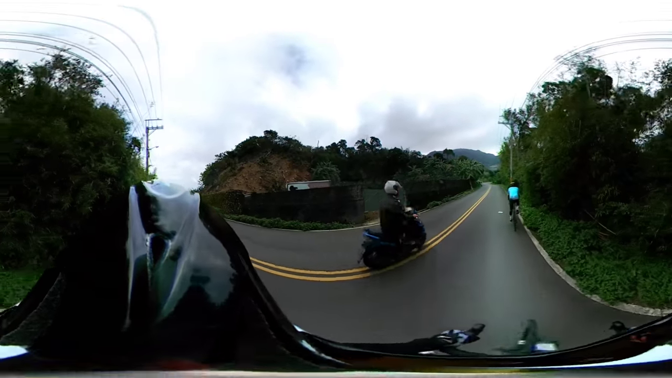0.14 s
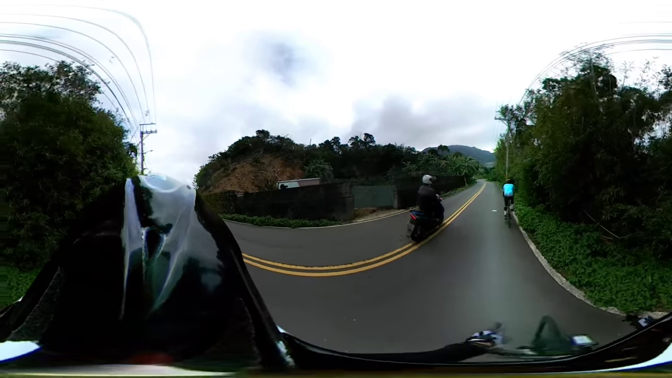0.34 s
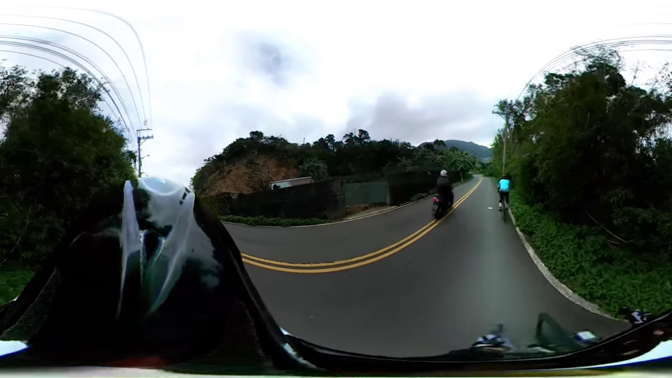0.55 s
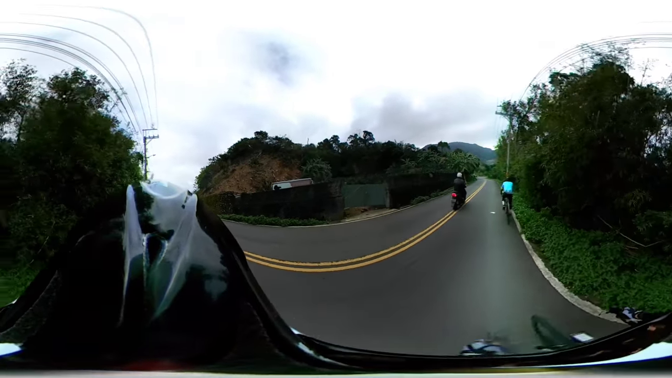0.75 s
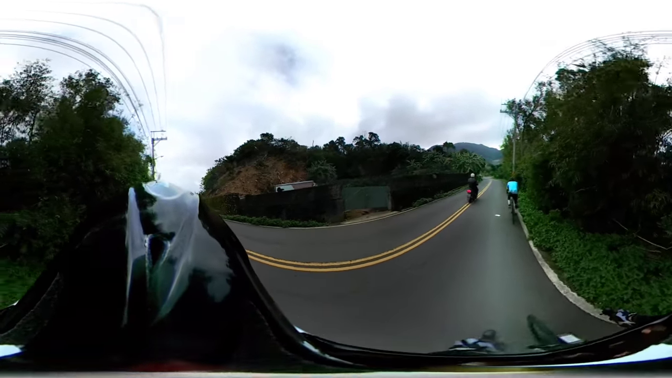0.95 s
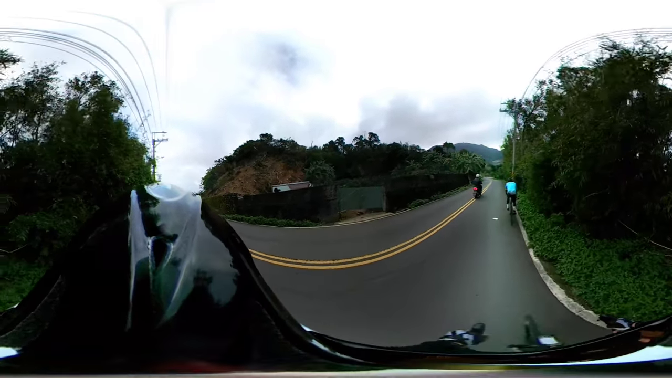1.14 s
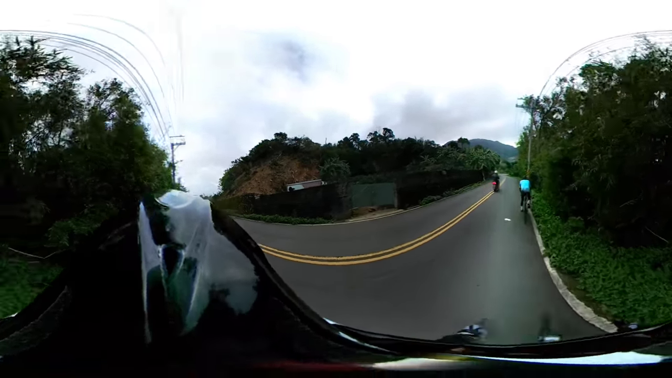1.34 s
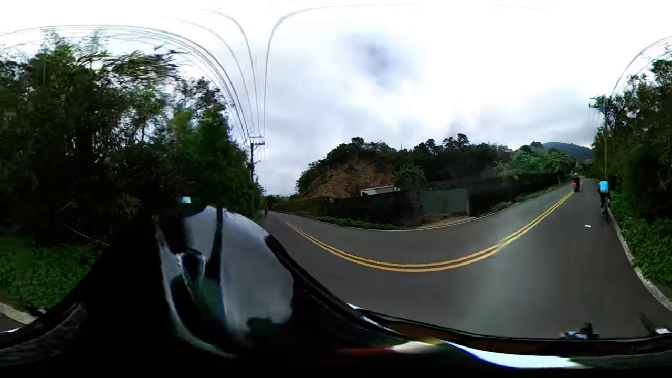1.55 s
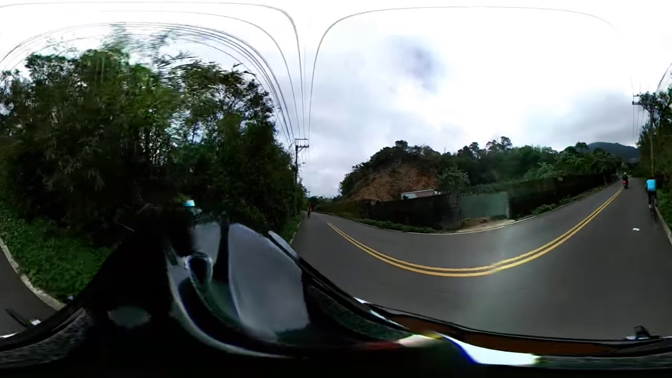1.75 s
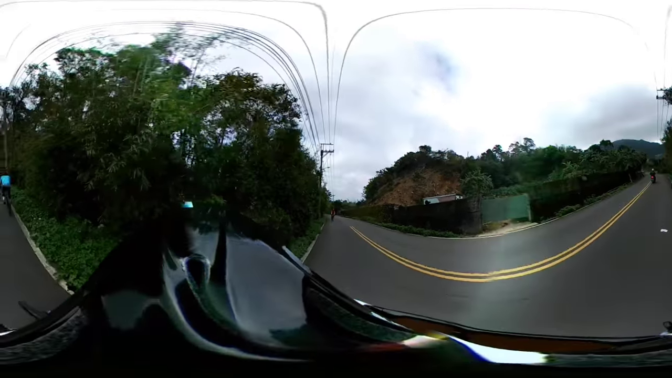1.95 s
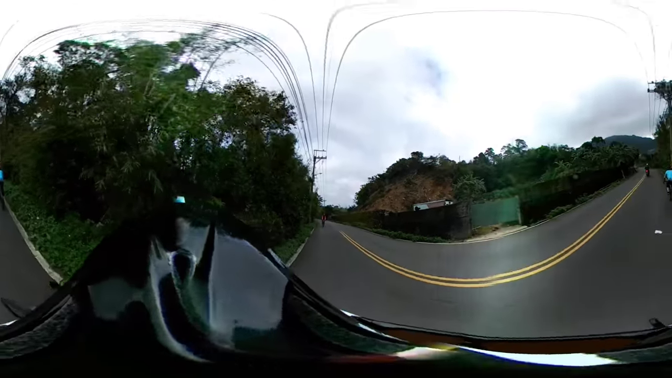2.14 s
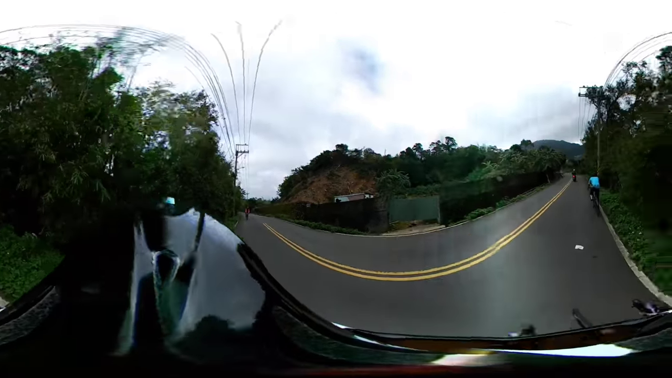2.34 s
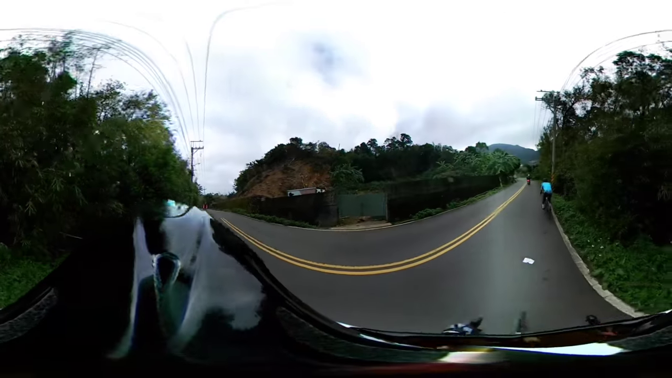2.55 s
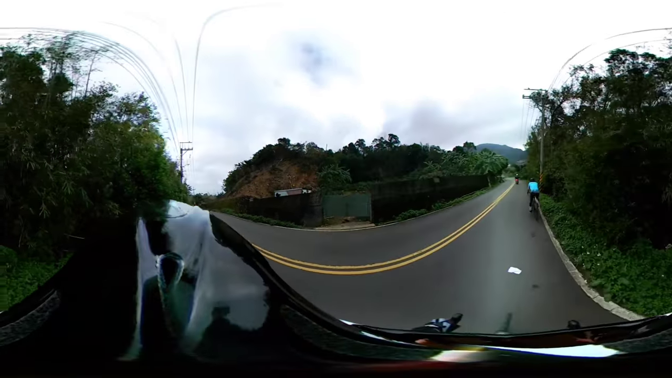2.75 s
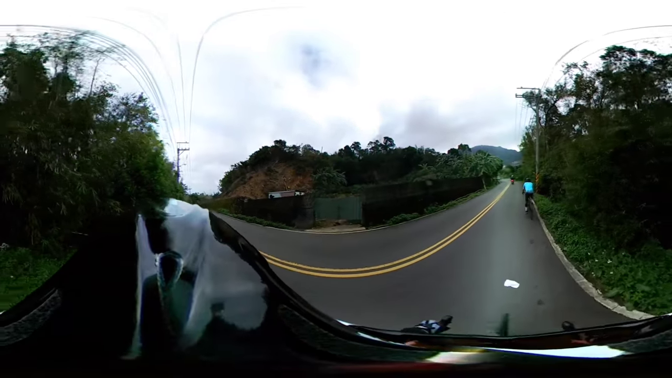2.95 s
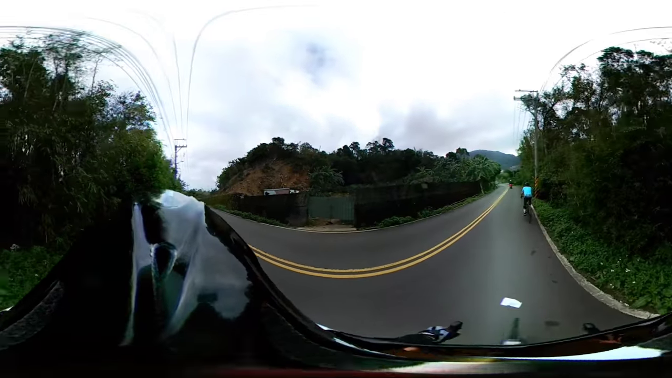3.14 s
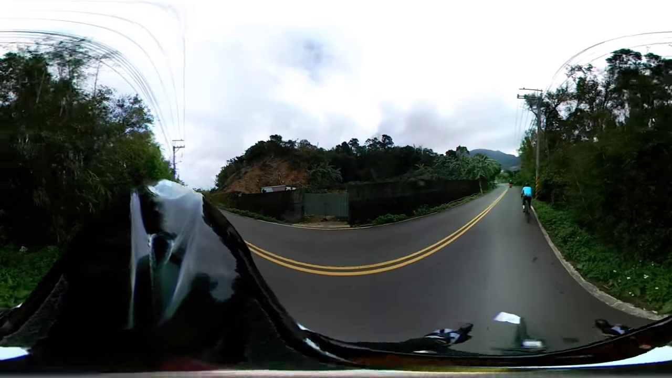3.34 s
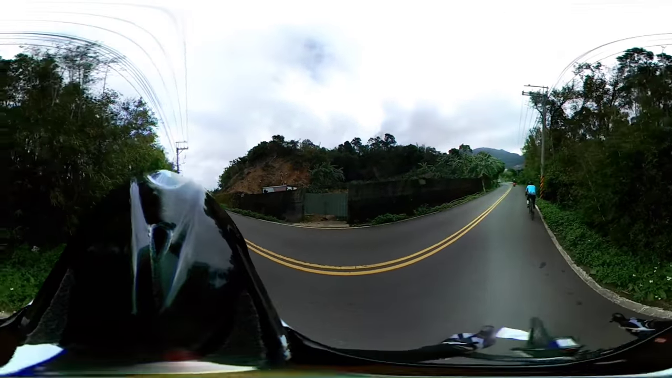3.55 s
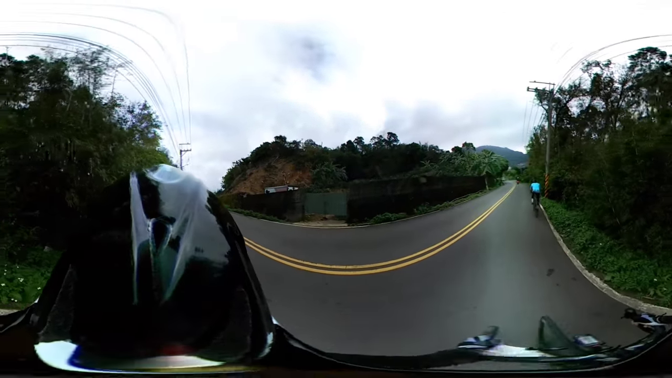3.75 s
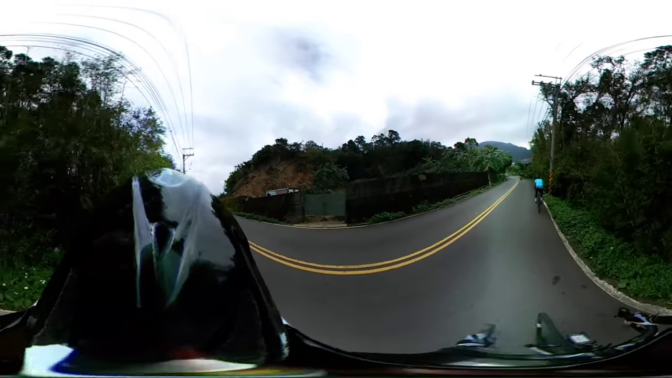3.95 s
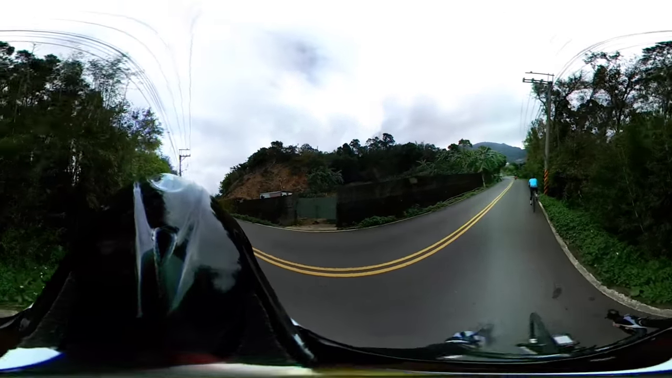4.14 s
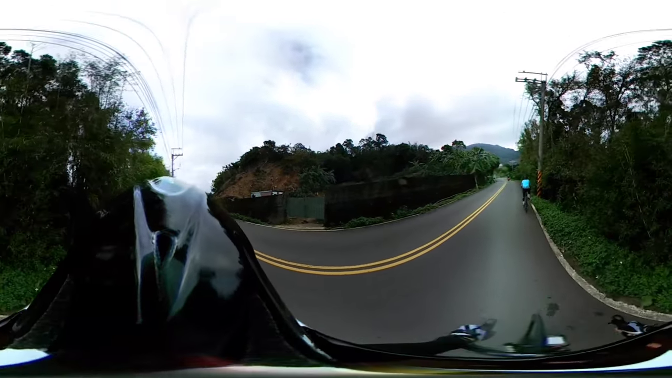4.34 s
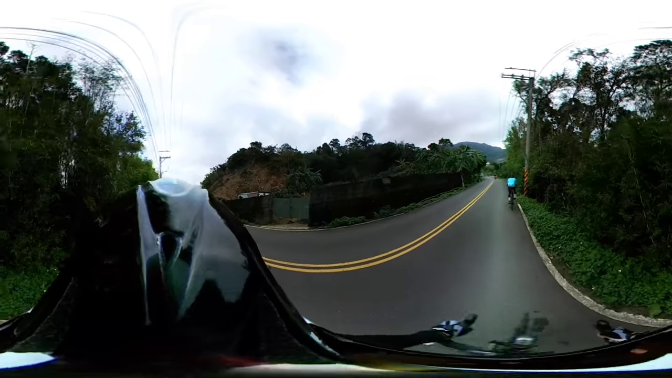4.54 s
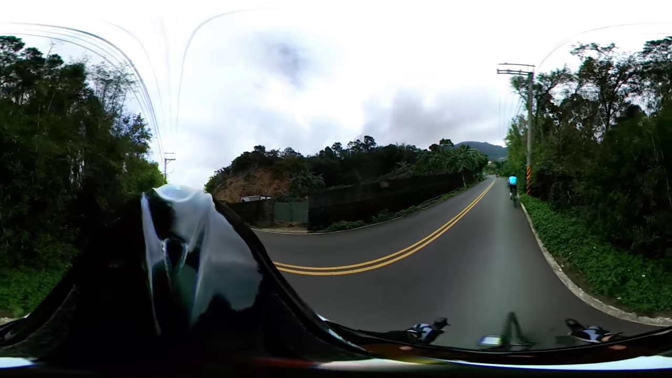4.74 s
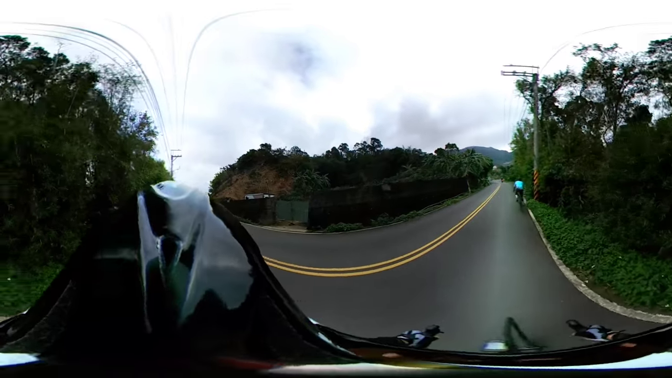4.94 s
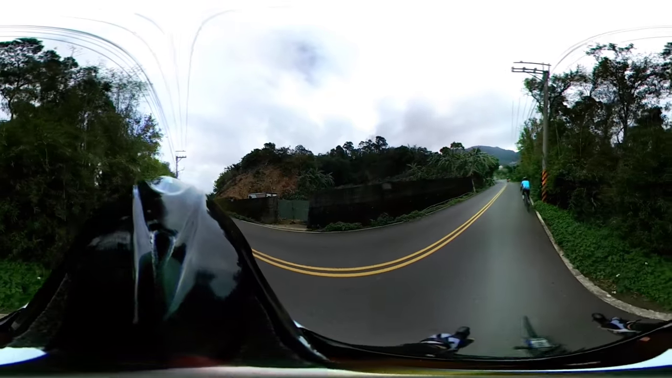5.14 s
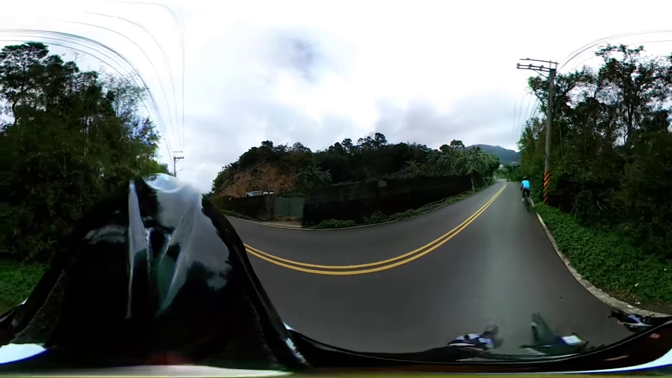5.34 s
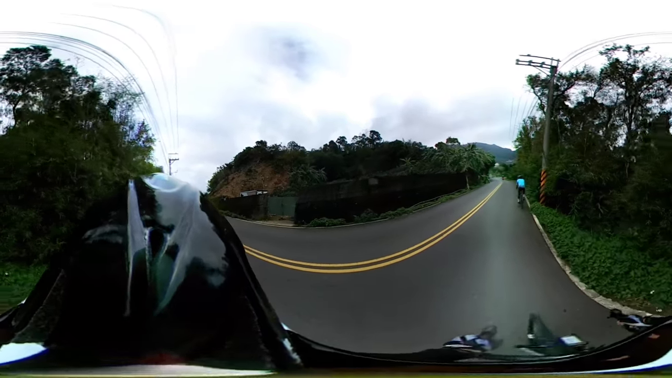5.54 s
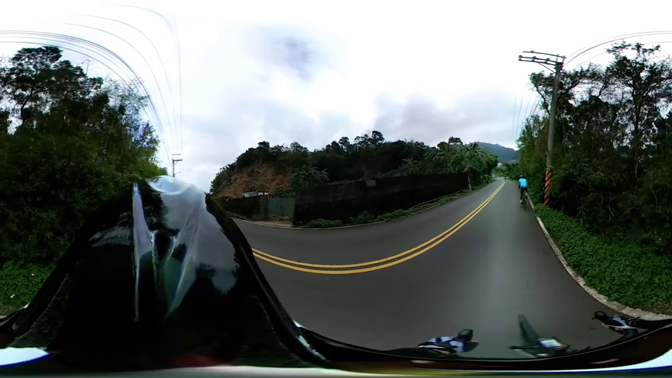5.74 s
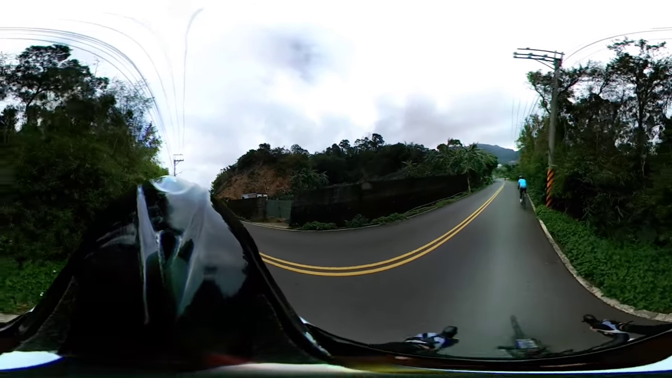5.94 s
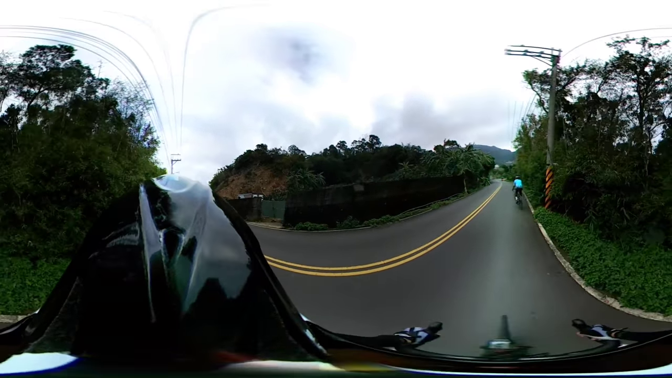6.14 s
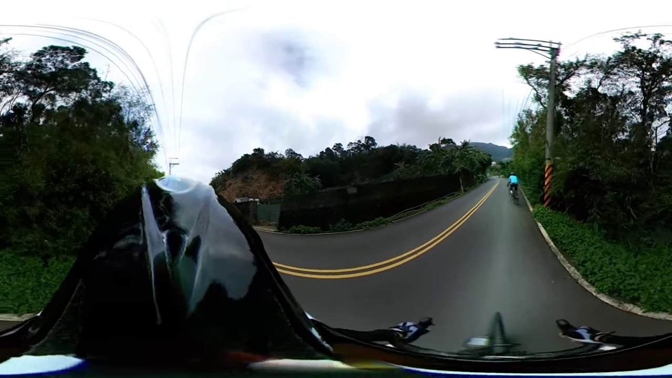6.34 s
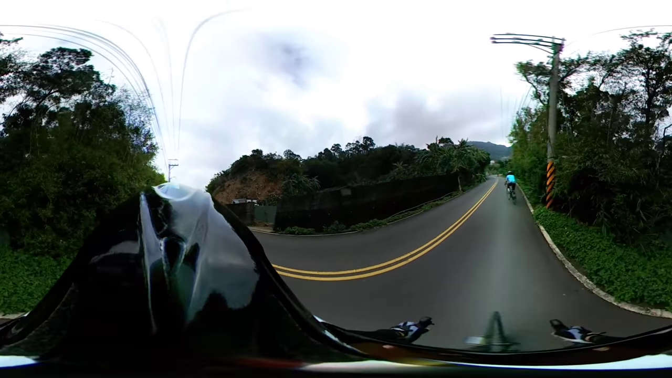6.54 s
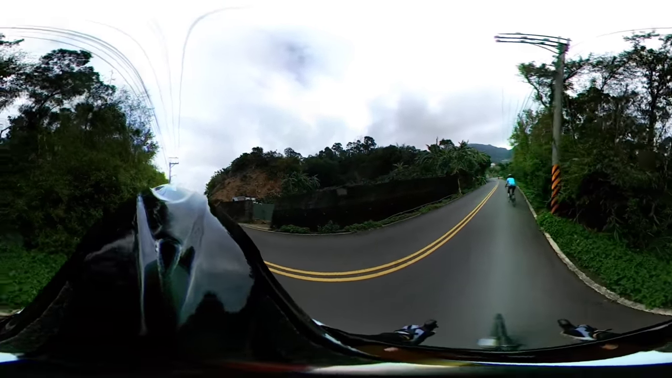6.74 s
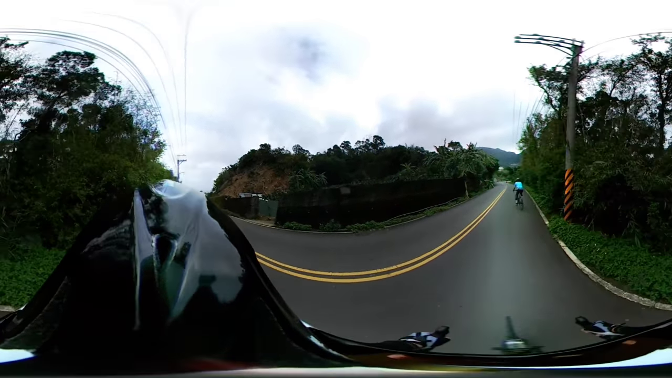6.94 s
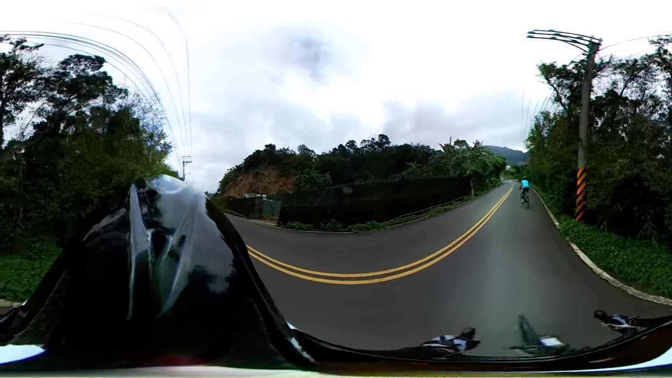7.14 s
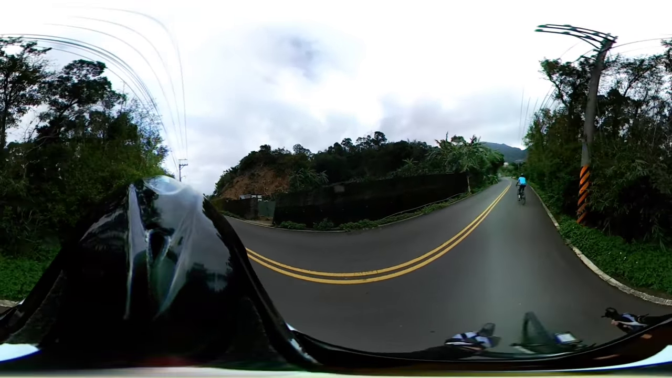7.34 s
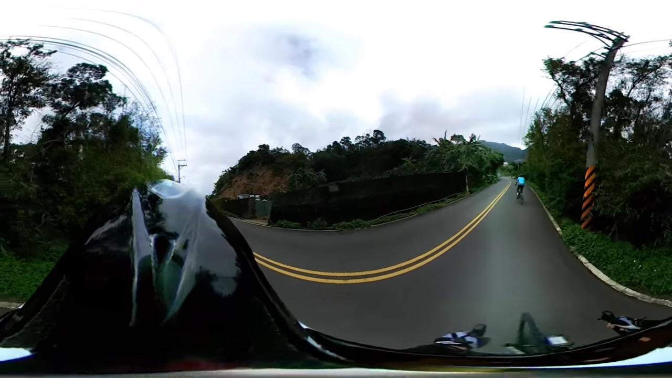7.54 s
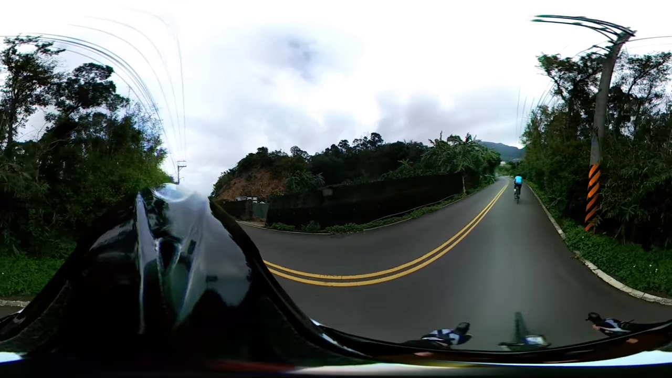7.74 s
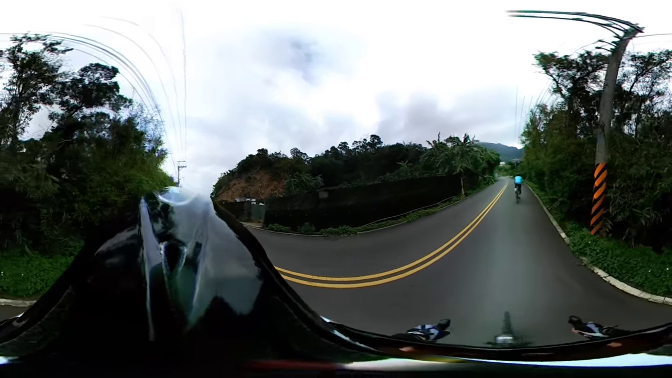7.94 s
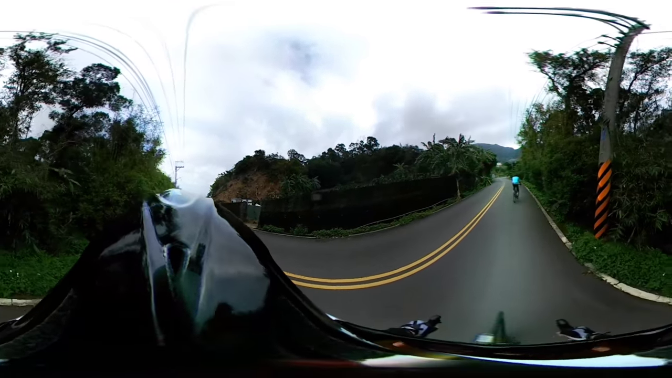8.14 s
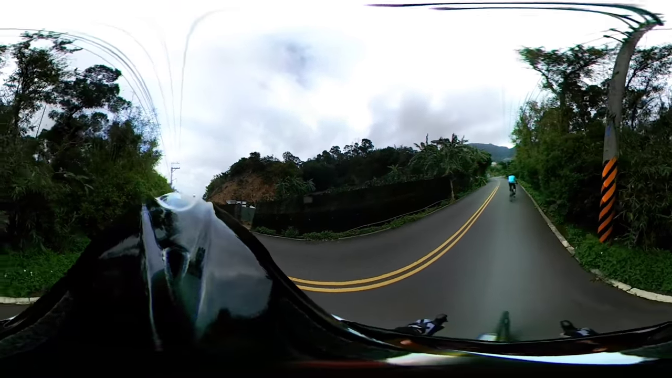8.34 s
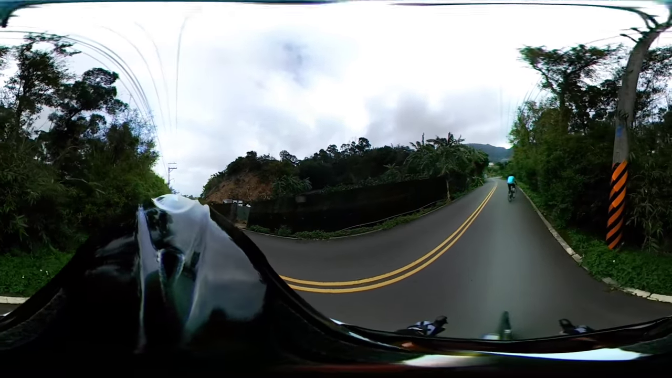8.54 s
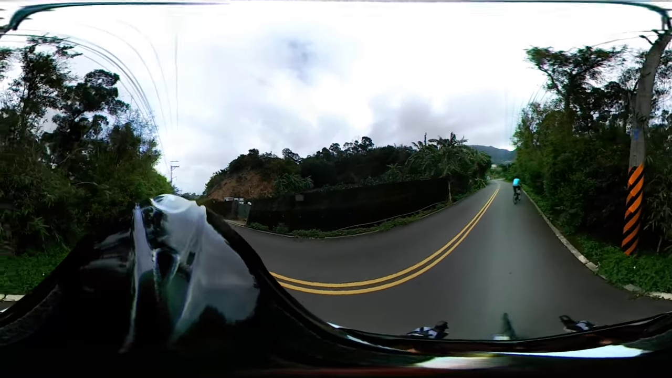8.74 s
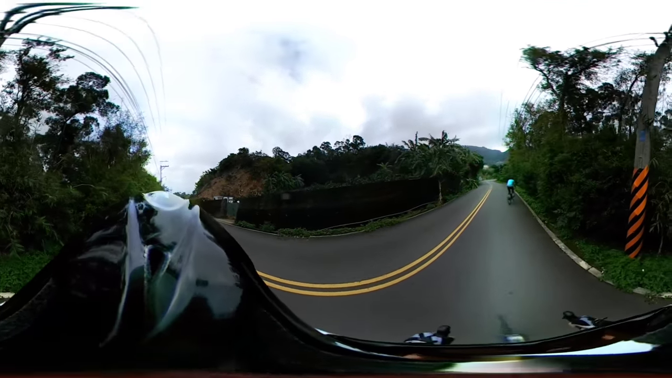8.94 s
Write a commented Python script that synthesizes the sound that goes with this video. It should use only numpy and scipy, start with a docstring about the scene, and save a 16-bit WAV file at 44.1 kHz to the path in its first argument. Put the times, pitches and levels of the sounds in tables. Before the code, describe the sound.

Heard from a bicycle's handlebar on an open, hedge-lined country road: a single-cylinder motorcycle is already passing on the left at the start, its exhaust barking and buzzing with a burst of engine and tyre hiss. It is loudest in the first second, then shrinks ahead, slightly right, into a thin uneven putter. A few dull frame bumps near one and a half seconds, faint rolling rumble, and very soft insect rasp on the right.

```python
"""A single-cylinder motorcycle overtakes a slow bicycle on a country road and draws away between hedges.
Each firing puffs pulses and gas through exhaust resonances; engine and tyre hiss is shaped noise that flares
at each firing. The bicycle adds low rolling noise, damped bumps and ticks; insects rasp in the right-hand hedge.
At the handlebar microphones each part of the spectrum has its own shifting left-right place."""
import sys
import numpy as np
from scipy import signal
from scipy.fft import rfft, irfft, next_fast_len
from scipy.io import wavfile
from scipy.ndimage import uniform_filter1d, map_coordinates

SR = 44100
rng = np.random.default_rng(int(sys.argv[2]) if len(sys.argv) > 2 else 0)


def to_wav(sig):
    """Store sig (one row per channel, or 1-D mono) as 16-bit WAV at the path in sys.argv[1].

    Samples outside -1..1 are clipped; the rate is SR.
    """
    pcm = np.clip(np.atleast_2d(sig), -1, 1) * 32767
    pcm = np.round(pcm).astype(np.int16)
    wavfile.write(sys.argv[1], SR, pcm.T)  # frames by channels


N = 401310

# Firing rate of the engine. Each row: time in seconds, rate in Hz.
FIRING_RATE = [(0.0, 49.07), (0.3, 48.21), (0.55, 47.89), (1.25, 47.14), (1.7, 47.7), (2.3, 48.22),
               (3.0, 48.3), (3.4, 48.57), (3.7, 48.36), (4.4, 48.29), (5.3, 48.25), (6.0, 47.84),
               (6.5, 47.24), (7.0, 46.03), (7.5, 46.51), (8.1, 46.22), (8.45, 45.59), (9.1, 46.3)]
# Exhaust as heard at the handlebar. Each row: time in seconds, throb, boom, honk, bark, snap levels in dB.
EXHAUST_LEVELS = [(0.0, -25, -41, -33, -32.5, -32.5), (0.07, -34, -25, -32, -34, -33),
                  (0.25, -30, -18, -41, -27.5, -24.5), (0.38, -31, -41, -49, -27.5, -23),
                  (0.46, -28.5, -33, -27, -30.5, -25), (0.63, -30, -21, -27, -31, -25),
                  (1.24, -37, -27.5, -37, -39.5, -36), (1.34, -40, -23, -36, -37, -36),
                  (1.47, -37, -19, -29, -38.5, -38.5), (1.77, -38, -32, -60, -39.5, -39),
                  (1.9, -37, -46, -35, -43, -39), (2.1, -36, -45, -46, -46, -41.5),
                  (2.66, -42.5, -53, -45.5, -43.5, -44), (2.91, -38, -41, -46, -40, -42.5),
                  (4.36, -44, -50, -50.5, -46.5, -44), (4.89, -45, -35, -48, -43.5, -47.5),
                  (5.14, -46, -47, -56, -46.5, -46), (5.3, -46, -45, -62, -53, -49),
                  (5.53, -53, -49, -67, -56, -50.5), (5.98, -45, -42.5, -68, -52.5, -50),
                  (6.51, -48.5, -44, -58, -56.5, -55), (7.0, -45, -40.5, -59, -50.5, -52.5),
                  (7.75, -49.5, -47.5, -53.5, -61.5, -52.5), (8.16, -53, -44, -64, -59, -59.5),
                  (9.05, -53, -46.5, -75, -61.5, -67), (9.1, -55, -63, -64, -62, -61)]
# Left-right place of each part, wandering separately. Each row: time in seconds, then left minus right in dB
# for throb, boom, bark and snap.
EXHAUST_PLACES = [(0.0, 13.5, 3, 5, 5), (0.38, 1, -8, -6.5, -9), (0.83, -6.5, -18, -8.5, -21),
                  (1.57, -13, -48, -10, -25), (1.82, -12, -7, -3.5, -17), (2.15, -7.5, 3.0, 5, -2),
                  (2.43, 1, 6.5, 6, 0), (2.81, -4, -9.5, -9, -20), (3.27, -12.5, -34, -7, -28),
                  (4.16, -11.5, -3.5, 2, -29), (5.55, -12, -16.5, 2, -26), (6.08, -12, -5, 6.0, -22),
                  (6.54, -11, -10, -5, -23), (6.69, -11, -3, 5, -25), (7.02, -11, -26, 2.5, -28),
                  (7.48, -12.5, -7.5, -5.5, -32), (8.64, -14, -28, -2, -23), (9.1, -13, -33, -1.5, -13.5)]
# Firings that crack louder or fall weaker. Each row: time in seconds, strength in units of the usual scatter.
ODD_FIRINGS = [(.281, -1), (.362, 0.5), (.425, 0), (.446, 1.3), (.718, -3), (.741, 0), (1.122, 0.95),
               (1.291, 0), (1.333, 0.89), (1.397, 1.3), (1.481, 0.5), (1.502, 0.63), (1.793, -5),
               (1.857, 0.3), (1.879, 1.3), (2.293, 1.5), (2.666, -2), (2.71, 1.2), (2.813, 1.2), (2.832, 1),
               (3.039, 1.8), (3.183, 1.7), (3.555, -5), (3.783, 2.3), (3.886, 1.2), (3.969, -5),
               (4.031, -3.5), (4.113, 0), (4.196, 1.5), (4.61, 1.8), (4.776, 0), (5.46, 2), (5.835, -6.5),
               (5.855, 1.7), (5.897, 2), (5.918, -4), (5.96, 1.7), (6.211, -1), (6.485, 1.7), (6.591, -3),
               (6.765, 1.6), (7.044, 1.4), (7.389, 1.8), (7.455, 1.7), (7.562, 0), (7.583, 1.7),
               (7.691, -4), (7.798, 1.8), (7.885, -5), (8.994, -8)]
# Distant swells of honk, bark and snap. Each row: middle in seconds, half length in seconds, gain in dB.
RASP_SWELLS = [(3.917, 0.045, 2), (6.03, 0.19, 0.5), (6.754, 0.1, 3), (7.09, 0.042, 2.5), (7.524, 0.2, 2),
               (7.953, 0.15, 0.5)]

# The firing rate and its double as tones. Each row: time in seconds, first and second levels in dB.
DEEP_TONES = [(0, -48, -36), (.3, -46, -38), (1, -55, -42), (1.3, -62, -55), (1.7, -67, -47), (2, -67, -47),
              (3, -62, -57.5), (3.9, -70, -65.5), (9.1, -82, -71)]
# Partials in the throb. Each row: time in seconds, third and fifth levels in dB.
THROB_PARTIALS = [(0, -39, -43), (.25, -37, -38), (.6, -32.5, -32), (1, -35.5, -34.5), (1.4, -38, -38),
                  (1.8, -40.5, -36), (2.2, -58, -47), (2.6, -45.5, -42), (3, -44.5, -42.5), (3.4, -47, -55),
                  (3.8, -49.5, -51), (4.2, -55, -47), (4.6, -62, -47.5), (5, -70, -49), (5.4, -62, -51.5),
                  (6, -59.5, -58), (7, -61, -64), (7.6, -61, -60), (9.1, -66.5, -67)]
# Partials that carry the note. Each row: time in seconds, fourth, ninth and twelfth levels in dB.
NOTE_PARTIALS = [(0, -38, -42, -34.5), (.25, -36.5, -33.5, -43), (.6, -26.5, -25, -33.5),
                 (1, -29, -29.5, -38), (1.4, -34.5, -29, -36.5), (1.8, -38, -35, -39.5),
                 (2.2, -36, -41, -45.5), (2.6, -42.5, -41.5, -48), (3, -53, -39, -42),
                 (3.4, -41, -41.5, -47), (3.8, -42, -43.5, -44.5), (4.2, -44, -43, -50),
                 (4.6, -46, -48, -46), (5, -55.5, -47.5, -46), (5.4, -55.5, -45.5, -60.5),
                 (5.8, -65, -48, -57), (6.2, -54, -45.5, -54), (6.6, -58, -43.5, -49),
                 (7, -53.5, -45.5, -53.5), (7.4, -53, -45.5, -53.5), (7.8, -57, -49.5, -51.5),
                 (8.2, -60, -47, -64.5), (9.1, -57, -47.5, -66)]
# Neighbours of the ninth partial. Each row: time in seconds, eighth and tenth levels in dB.
BOOM_FLANKS = [(0, -32, -44), (.12, -32, -52), (.25, -32.5, -35), (.6, -30.5, -26.5), (1, -33, -32.5),
               (1.4, -40, -34), (1.8, -39, -38.5), (2.2, -40.5, -42.5), (2.6, -43.5, -42.5),
               (3, -36.5, -44), (3.4, -44.5, -42.5), (3.8, -44, -49), (4.2, -47, -44.5), (4.6, -49, -48.5),
               (5, -49, -47.5), (5.6, -55, -55), (6.2, -56, -53), (6.6, -51.5, -53.5), (7, -65, -46.5),
               (7.4, -63, -55), (7.8, -59, -57.5), (8.2, -65, -53), (9.1, -61, -57)]
# The fourteenth partial, singing out alongside. Each row: time in seconds, level in dB.
WHINE_LEVEL = [(0, -39), (.1, -29.5), (.3, -29), (.45, -36), (.8, -36), (1.4, -38), (1.8, -44.5),
               (2.4, -49), (3, -64), (3.4, -47), (3.8, -68), (4.2, -57), (5, -56.5), (6.2, -68),
               (7.4, -58.5), (9.1, -82)]

# Resonances of the exhaust parts. Each row: centre in Hz, width in Hz, relative level in dB.
THROB_MODES = [(141.5, 86, -3), (194.7, 51, 1), (239.2, 11.3, -2), (324, 100, -2)]
BOOM_MODES = [(402.5, 9.1, 1.8), (404, 35.2, 9.1), (481, 67, 4.3)]
HONK_MODES = [(572, 45, 0), (625, 40, -3), (672, 40, -5)]
BARK_MODES = [(844, 120, 72), (874, 22, 0.72)]
SNAP_MODES = [(1025, 226, -2), (1265, 155, 3), (1447, 75, 3.5), (1756, 118, -2)]
# Ringing of the silencer shell. Each row: centre in Hz, width in Hz, relative level in dB.
SHELL_MODES = [(1921, 65, 1), (2404, 300, -8)]

# Engine and tyre hiss at the handlebar. Each row: time in seconds, low, lower middle and high levels in dB.
HISS_LEVELS = [(0.0, -35, -35, -45), (0.02, -34, -42, -45), (0.2, -31.5, -38, -37.5),
               (0.3, -32, -38, -36.5), (0.45, -37, -33, -40.5), (0.58, -35, -34.5, -45.5),
               (0.88, -39.5, -41.5, -51.5), (1.44, -43.5, -48, -59), (1.93, -49, -49.5, -62.5),
               (2.28, -52.5, -47, -63), (2.76, -49.5, -57, -69), (4.05, -51, -64, -71.5),
               (5.19, -53, -66, -76), (5.32, -57.5, -90, -78.5), (6.31, -61.5, -92, -81),
               (7.63, -63.5, -99, -79.5), (8.17, -72, -95, -88.5), (8.23, -67, -75, -85),
               (8.31, -67, -75, -85.5), (8.48, -71.5, -74, -86.5), (8.56, -75, -87, -84.5),
               (9.1, -71, -93, -85)]
# Colours of the four hiss bands, low to high. Each row: frequency in Hz, relative spectral level in dB per Hz.
LOW_COLOUR = [(1030, -56), (1750, -2), (1900, -5), (2070, -12), (2900, -15), (3770, -47), (6380, -120)]
LOWER_COLOUR = [(1680, -4.5), (2850, 2), (3740, -5), (4000, -3.5), (5200, -41), (8800, -120)]
MIDDLE_COLOUR = [(2350, -10.5), (4000, -5.5), (5270, -4.5), (6120, -7), (7210, -10.5), (7800, -14),
                 (10100, -23.5), (17200, -120)]
UPPER_COLOUR = [(4590, -41), (7800, -41), (8360, -7), (10100, -5), (13800, -8), (15500, -9), (16100, -24)]

# Scatter from the hedges. Each row: frequency in Hz, time to decay by 60 dB in seconds.
HEDGE_DECAY = [(100, 1), (1000, 0.13), (5000, 0.022)]
# Echo from a roadside wall, mostly ever sooner. Each row: time in seconds, delay in ms.
WALL_DELAY = [(0, 17.5), (.6, 19.3), (1.3, 14.7), (2.25, 9), (2.95, 8.5), (3.45, 5.8), (3.9, 4.7),
              (5.1, 4.35), (5.7, 2.3), (6.2, 1.4), (9.1, 2.4)]

# Rolling rumble through the bicycle. Each row: time in seconds, level in dB.
ROLLING_LEVEL = [(0, -62), (1.1, -56), (1.4, -53), (1.7, -46), (2.2, -64), (4.5, -68), (5.2, -67), (6, -64),
                 (7, -65), (7.8, -72), (8.7, -69), (9.1, -70)]
# Colour of the rolling rumble. Each row: frequency in Hz, relative spectral level in dB per Hz.
RUMBLE_COLOUR = [(25, -36), (38, -9), (60, -1), (130, -2), (300, -4.5), (500, -28), (900, -120)]
# Bumps through the frame. Each row: time in seconds, level in dB before the push is shaped, pitch in Hz.
FRAME_BUMPS = [(1.16, -43, 103), (1.331, -25, 90), (1.683, -21, 101), (1.761, -23, 90), (3.852, -39, 84.5),
               (5.203, -25, 70), (5.276, -31, 131), (8.749, -39.5, 79.5)]
# Small bicycle ticks. Each row: start in seconds, starting level in dB before placing.
BICYCLE_TICKS = [(5.236, -61), (5.5707, -61), (6.754, -63)]
# Insects in the hedge. Each row: time in seconds, level in dB.
INSECT_LEVEL = [(0, -75), (3, -72), (3.6, -65), (4.3, -65.5), (5, -73), (6, -79.5), (7, -77.5),
                (7.5, -68.5), (8, -86), (9.1, -87)]
# Notches of the microphone housing. Each row: centre in Hz, width in Hz, gain in dB.
HOUSING_NOTCHES = [(3960, 62, -17), (7750, 150, -16)]

RECEDE_S = 3.55  # time scale of drawing away
FLUTTER_DB, BOOM_FLUTTER_DB, WAVER_DB = 1.64, 3, 2.2  # the air makes the note flutter; far partials waver
ALONGSIDE_S = .7  # until then the sharp parts of a puff arrive well ahead of the boom
GROUPED, OWN_SCATTER = .35, .35  # scatter shared by neighbouring firings; scatter of each part by itself
UNEVEN_NEAR, UNEVEN_FAR = .6, 1.35  # firing scatter alongside and in the distance
SOFTENS_DB = 4  # far away the gas gains on bark and snap
ARRIVAL_GAS_DB, ARRIVAL_S = 7, .25  # before the pipe points our way the gas drowns the strokes
CHAMBER_HZ, CHAMBER_WIDTH_HZ = 215, 40  # the silencer delays the throb around this pitch
HISS_LEFT_DB, HISS_RIGHT_DB, CROSSING_S = 16.5, -12, 1.1  # the hiss passes from left to right
MIDDLE_DB, MIDDLE_GAINS_DB = 6.5, 3.5  # upper middle over the high hiss, and what it gains far away
GUSTS_DB, PATCHES_DB = 1, 1.7  # swells of the lower and of the upper hiss
SHUDDER_DB, SHUDDER_S = -24, .035  # the frame shudders around each bump
BOTTOM_HZ, TOP_HZ = 36, 16250  # reach of the microphones


def motorcycle():
    """Exhaust puffs and hiss pass the handlebar; throb, boom, bark and snap each keep their own place."""
    turns = np.cumsum(curves(FIRING_RATE)[0]) / SR + .34  # firings so far
    puffs = exhaust_puffs(turns)
    throb_db, boom_db, *rasp_db = curves(EXHAUST_LEVELS)
    swell_db = sum(db * np.exp(-((np.arange(N) / SR - s) / half) ** 4) for s, half, db in RASP_SWELLS)
    honk_db, bark_db, snap_db = rasp_db + swell_db + FLUTTER_DB * far() * wobble(16)
    boom_db = boom_db + BOOM_FLUTTER_DB * wobble(9)
    throb_at, boom_at, bark_at, snap_at = curves(EXHAUST_PLACES)
    fourth_db, ninth_db, twelfth_db = curves(NOTE_PARTIALS)

    note = placed(exhaust_throb(puffs, turns, throb_db, fourth_db), throb_at)
    note = note + placed(exhaust_boom(puffs, turns, boom_db, ninth_db), boom_at)
    honk = exhaust_honk(puffs, turns, honk_db, twelfth_db)
    bark = exhaust_bark(puffs, bark_db)
    note = note + placed(honk + bark + intake_roar(bark_db), bark_at)
    note = note + placed(exhaust_snap(puffs, snap_db), snap_at)
    return note + placed(hiss(turns, shell_ring(puffs)), crossing())


def exhaust_puffs(turns):
    """Gives a maker of pulse trains: uneven strokes, partly shared by neighbours, plus the hedges' answer."""
    draw = np.clip(rng.standard_normal((int(turns[-1]) + 1, 2)), -1.5, 1.3)  # size, timing
    moments = np.linspace(0, N - 1, len(draw)).astype(int)
    shared = wobble(7)[moments].clip(-1.5, 1.3)
    draw[:, 0] = np.sqrt(1 - GROUPED) * draw[:, 0] + np.sqrt(GROUPED) * shared
    draw[:, 0] *= UNEVEN_NEAR + (UNEVEN_FAR - UNEVEN_NEAR) * far()[moments]
    for s, strength in ODD_FIRINGS:
        draw[round(turns[round(s * SR)]) - 1] = strength, 0
    scattered = hedges(firings(turns, draw, scatter_db=0.5, jitter=0, late=0.004044))

    def puffs(scatter_db, late, hedge_db, drag=0, lead=0):
        own = OWN_SCATTER * rng.standard_normal(draw.shape).clip(-1.5, 1.5)
        direct = firings(turns, draw + own, scatter_db, .00009, late, drag, lead)
        return direct + amp(hedge_db) * scattered

    return puffs


def exhaust_throb(puffs, turns, throb_db, fourth_db):
    """The lowest, latest part of a puff, phase-delayed in the silencer and echoed by a wall, with two deep tones."""
    deep_puffs = puffs(0.4, late=0.0055, hedge_db=-19)
    throb = part(deep_puffs, THROB_MODES, lo_hz=112, hi_hz=318, gas_db=-19 + SOFTENS_DB * far())
    chamber = lambda hz: np.exp(-1j * np.arctan2(hz * CHAMBER_WIDTH_HZ, CHAMBER_HZ ** 2 - hz ** 2))
    echoed = unit(wall(filtered(throb, chamber), echo_db=-10))
    third_db, fifth_db = curves(THROB_PARTIALS)
    throb = voiced(echoed, turns, throb_db, {3: third_db, 4: fourth_db, 5: fifth_db})
    for order, db in enumerate(curves(DEEP_TONES), 1):
        throb = throb + np.sqrt(2) * amp(db) * np.sin(2 * np.pi * order * turns)
    return throb


def exhaust_boom(puffs, turns, boom_db, ninth_db):
    """The boom builds just after the snap, around the ninth multiple of the firing rate."""
    boom_puffs = puffs(0.8, late=0.003, hedge_db=-21, drag=0.003)
    boom = part(boom_puffs, BOOM_MODES, lo_hz=290, hi_hz=520, gas_db=-17 + 1.6 * gas_gain())
    eighth_db, tenth_db = curves(BOOM_FLANKS)
    return voiced(boom, turns, boom_db, {8: eighth_db, 9: ninth_db, 10: tenth_db})


def exhaust_honk(puffs, turns, honk_db, twelfth_db):
    """The honk resonates between boom and bark and carries the twelfth and fourteenth partials."""
    honk_puffs = puffs(1.6, late=.005, hedge_db=-20, drag=.001)
    honk = part(honk_puffs, HONK_MODES, lo_hz=530, hi_hz=715, gas_db=-14 + 2 * SOFTENS_DB * far())
    return voiced(honk, turns, honk_db, {12: twelfth_db, 14: curves(WHINE_LEVEL)[0]})


def exhaust_bark(puffs, bark_db):
    """Puffs and gas strike resonances that ring on above the honk."""
    bark_puffs = puffs(1.8, late=.0022, hedge_db=-9, drag=.004, lead=.004)
    bark = part(bark_puffs, BARK_MODES, lo_hz=775, hi_hz=1010, gas_db=-9 + gas_gain(), ringing=True)
    return amp(bark_db) * bark


def exhaust_snap(puffs, snap_db):
    """The sharp, ringing top of each puff comes first."""
    snap_puffs = puffs(3.2, late=-0.000947, hedge_db=-7, drag=0.00603, lead=0.0074)
    snap = part(snap_puffs, SNAP_MODES, lo_hz=930, hi_hz=1864, gas_db=-4 + gas_gain(), ringing=True)
    return amp(snap_db) * snap


def intake_roar(bark_db):
    """The intake roars between honk and bark: band noise that follows the bark and falls back with distance."""
    roar = unit(through(noise_pair(0.93), [(612, 110, 0)], lo_hz=695, hi_hz=800))
    return amp(bark_db - 5 - 3.4 * far()) * roar


def shell_ring(puffs):
    """The silencer shell rings to puffs and gas."""
    shell_puffs = puffs(4.2, late=0, hedge_db=8.0)
    return part(shell_puffs, SHELL_MODES, lo_hz=1700, hi_hz=2720, gas_db=-0.5, ringing=True)


def hiss(turns, ring):
    """Gas and tyre noise; valve clatter makes it flare at each firing. The nearer, the more alike on both sides."""
    low_db, lower_db, upper_db = curves(HISS_LEVELS)
    low_db = low_db + GUSTS_DB * wobble(8)
    lower_db = lower_db + GUSTS_DB * wobble(7.8)
    middle_db = upper_db + MIDDLE_DB + MIDDLE_GAINS_DB * far() + PATCHES_DB * far() * wobble(5)
    upper_db = upper_db + PATCHES_DB * far() * wobble(4)
    near = np.exp(-np.arange(N) / SR / 1.3)

    t = np.arange(SR // 25) / SR
    clatter_draw = rng.standard_normal((int(turns[-1]) + 1, 2))
    clatter = firings(turns, clatter_draw, scatter_db=2.0, jitter=0.00065, late=0.0062)
    flare = signal.fftconvolve(clatter, t / 0.001 * np.exp(1 - t / 0.0023))[:N]

    def band(colour, alike, depth):
        noise = filtered(noise_pair(alike), lambda hz: amp(along(colour, hz)))
        return unit((1 + depth * (0.35 + 0.22 * near) * flare) * noise)

    low = amp(low_db) * unit(band(LOW_COLOUR, 0.99, depth=0.65) + amp(1.0) * ring)
    lower = amp(lower_db) * band(LOWER_COLOUR, 0.55 + 0.66 * near, depth=0.62)
    middle = amp(middle_db) * band(MIDDLE_COLOUR, .3 + .65 * near, depth=.4)
    upper = amp(upper_db) * band(UPPER_COLOUR, .15 + .8 * near, depth=.6)
    return low + lower + middle + upper


def bicycle():
    """Rolling rumble, soft bumps and tiny ticks reach the handlebar through the frame."""
    return rolling() + placed(bumps_and_ticks(), -9)


def rolling():
    """Low noise comes in lumps and swells where the frame shudders around each bump."""
    lumps_db = 4.5 * wobble(9)
    t = np.arange(N) / SR
    shudder = sum(amp(db + SHUDDER_DB) * np.exp(-((t - s) / SHUDDER_S) ** 2) for s, db, hz in FRAME_BUMPS)
    rumble = unit(filtered(noise_pair(0.38), lambda hz: amp(along(RUMBLE_COLOUR, hz))))
    return (amp(curves(ROLLING_LEVEL)[0] + lumps_db) + shudder) * rumble


def bumps_and_ticks():
    """A bump is a damped sine with a weak overtone; a tick is a noise grain that dies in milliseconds."""
    jolts, t = np.zeros(N + SR), np.arange(SR // 8) / SR
    for s, db, hz in FRAME_BUMPS:
        overtone = np.sin(2 * np.pi * hz * rng.uniform(2.2, 2.4) * t + rng.uniform(0, 2.7))
        shake = np.sin(2 * np.pi * hz * t) + 0.2 * overtone
        push = shake * (t / 0.042) * np.exp(1 - t / 0.0095)
        jolts[round((s - .02) * SR):][:len(t)] += amp(db) * push  # begins 20 ms ahead of the listed time
    for s, db in BICYCLE_TICKS:
        jolts[round(s * SR):][:len(t)] += amp(db - 60 * t / 0.005) * rng.standard_normal(len(t))
    return jolts[:N]


def insects():
    """A narrow, wavering band of noise rasps from the hedge on the right."""
    rasp = through(noise_pair(0.17), [(5260, 810, 0)], lo_hz=4100, hi_hz=6400)
    return placed(amp(curves(INSECT_LEVEL)[0] + wobble(12)) * unit(rasp), -11)


def hedges(x):
    """The roadside scatters a dying answer, highs dying first, not quite the same on both sides."""
    hz, t, z = signal.stft(noise_pair(0.99)[:, :SR // 3], SR, nperseg=256)
    tail = signal.istft(z * amp(-60 * t / along(HEDGE_DECAY, hz)[:, None]), SR, nperseg=256)[1]
    return signal.fftconvolve(x[None], tail / np.linalg.norm(tail[0]), axes=1)[:, :N]


def wall(x, echo_db):
    """x and its echo; their comb of notches climbs as the delay shrinks."""
    earlier = np.arange(N) - curves(WALL_DELAY)[0] * SR / 1000
    echo = np.array([np.interp(earlier, np.arange(N), side) for side in x])
    return x + amp(echo_db) * echo


def far():
    """0 alongside, towards 1 in the distance."""
    return 1 - np.exp(-np.arange(N) / SR / RECEDE_S)


def crossing():
    """Left minus right dB of a source that moves from beside to ahead."""
    return HISS_RIGHT_DB + (HISS_LEFT_DB - HISS_RIGHT_DB) / (1 + (np.arange(N) / SR / CROSSING_S) ** 2)


def gas_gain():
    """Gas gain in dB: high before the pipe points our way, rising again with distance."""
    return SOFTENS_DB * far() + ARRIVAL_GAS_DB * np.exp(-(np.arange(N) / SR / ARRIVAL_S) ** 2)


def firings(turns, draw, scatter_db, jitter, late, drag=0, lead=0):
    """One pulse a firing, uneven in size and timing (s); drag delays and lead advances it (s) while near."""
    at = np.flatnonzero(np.diff(np.floor(turns)))
    t = at / SR
    shift = late + drag * np.exp(-t / 1.185) - lead * np.exp(-(t / ALONGSIDE_S) ** 4)
    shift = shift + jitter * draw[:len(at), 1]
    moved = np.clip(at + np.round(shift * SR), 0, N - 1).astype(int)
    return np.bincount(moved, amp(scatter_db * draw[:len(at), 0]), N)


def part(puffs, modes, lo_hz, hi_hz, gas_db, ringing=False):
    """One part of the exhaust note: puffs and turbulent gas in the same resonances."""
    gas = amp(gas_db) * rng.standard_normal(N)
    return unit(through(unit(puffs) + gas, modes, lo_hz, hi_hz, ringing))


def voiced(x, turns, db, lines):
    """A part at its level, its strongest partials at levels of their own that waver far away."""
    taken = [(partial(x, turns, order), line_db) for order, line_db in lines.items()]
    rest = x - sum(line for (line, _), _ in taken)
    sung = sum(amp(line_db + WAVER_DB * far() * wobble(8)) * even for (_, even), line_db in taken)
    return amp(db) * rest + sung


def partial(x, turns, order):
    """One multiple of the firing rate taken out of x: as it is, and levelled to an rms near 1."""
    carrier = np.exp(2j * np.pi * order * turns)
    mean = lambda v, size: uniform_filter1d(uniform_filter1d(v, size), size)
    z = mean(x * carrier.real, size=SR // 47) - 1j * mean(x * carrier.imag, size=SR // 47)
    line = 2 * (z * carrier).real
    return line, line / (np.sqrt(2) * mean(np.abs(z), size=SR // 5) + 1e-9)


def through(x, modes, lo_hz, hi_hz, ringing=False):
    """x coloured by the modes between two steep edges: a compact burst, or a blow that rings on."""
    def ring(f):
        return sum((-1) ** k * amp(db) * 1j * f * w / (c * c - f * f + 1j * f * w)
                   for k, (c, w, db) in enumerate(modes))

    edge = lambda f: 1 / (1 + (lo_hz / (f + 1)) ** 12) / (1 + (f / hi_hz) ** 12)
    return filtered(x, lambda f: (ring(f) if ringing else np.abs(ring(f))) * edge(f))


def filtered(x, response):
    """x times a complex response of frequency."""
    m = next_fast_len(N + SR // 2)
    return irfft(rfft(x, m) * response(np.fft.rfftfreq(m, 1 / SR)), m)[..., :N]


def placed(x, left_db):
    """Sets left minus right in dB with constant-power gains."""
    turn = np.arctan(amp(left_db))
    return np.sqrt(2) * x * np.array([np.sin(turn), np.cos(turn)]).reshape(2, -1)


def noise_pair(alike):
    """Two white noises with the given likeness."""
    a, b = rng.standard_normal((2, N))
    turn = np.arccos(np.clip(alike, -1, 1)) / 2
    return np.array([np.cos(turn) * a + np.sin(turn) * b, np.cos(turn) * a - np.sin(turn) * b])


def wobble(rate):
    """A smooth random curve, rate knots a second."""
    at = np.arange(0, N + 64, 64)
    knots = rng.standard_normal(int(N * rate / SR) + 4)
    return np.interp(np.arange(N), at, map_coordinates(knots, [at * rate / SR]))


def curves(rows):
    """One value per sample for each column after the time."""
    s, *cols = np.transpose(rows)
    return [np.interp(np.arange(N) / SR, s, c) for c in cols]


def along(points, hz):
    """(Hz, value) points on a log axis."""
    f, v = np.transpose(points)
    return np.interp(np.log(hz + 1), np.log(f + 1), v)


def amp(db):
    """Amplitude ratio of a level in dB."""
    return 10 ** (np.asarray(db) / 20)


def unit(x):
    """x at an rms of 1."""
    return x / np.sqrt(np.mean(x ** 2) + 1e-20)


def scene():
    """The motorcycle, the bicycle under the microphones and the hedge insects together."""
    return motorcycle() + bicycle() + insects()


def record(dry):
    """The right capsule hears lower tones a little later, the housing notches two bands, the capsules hiss faintly."""
    notch = lambda hz: amp(sum(db * np.exp(-((hz - c) / w) ** 2) for c, w, db in HOUSING_NOTCHES))
    sides = np.array([[1], [-1]])  # left early, right late
    lag = lambda hz: np.exp(1j * np.pi * hz * .00003 / (1 + (hz / 4000) ** 2) * sides)
    reach = lambda hz: (hz < TOP_HZ) / (1 + (BOTTOM_HZ / (hz + 1)) ** 8)
    capsule_hiss = amp(-82.5) * rng.standard_normal((2, N))
    return filtered(dry + capsule_hiss, lambda hz: lag(hz) * notch(hz) * reach(hz))


dry = scene()
out = record(dry)
to_wav(out)
```